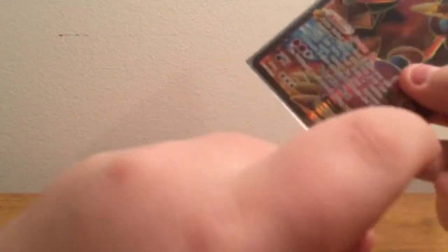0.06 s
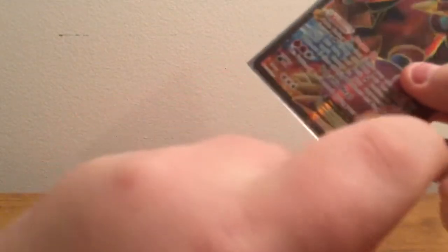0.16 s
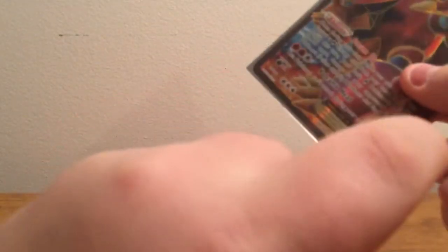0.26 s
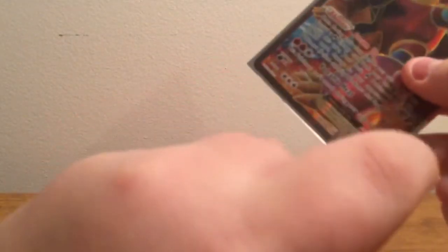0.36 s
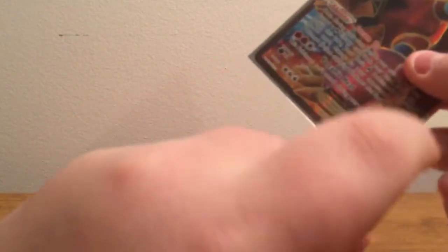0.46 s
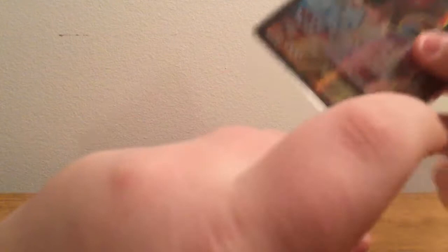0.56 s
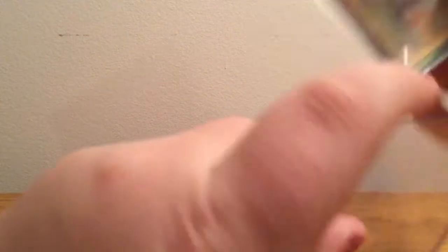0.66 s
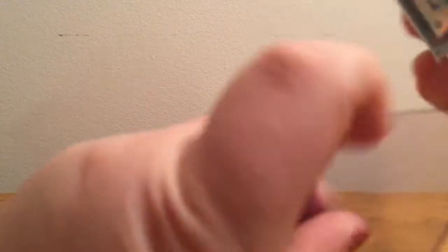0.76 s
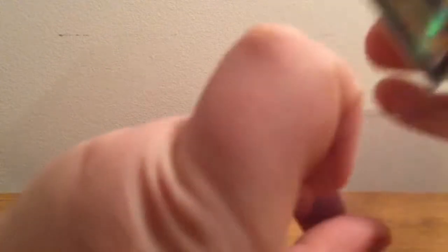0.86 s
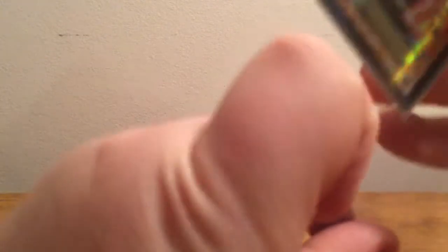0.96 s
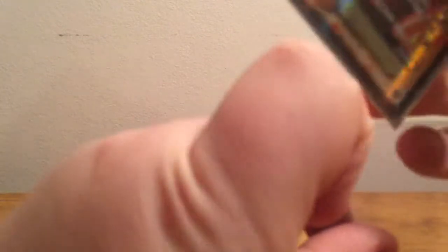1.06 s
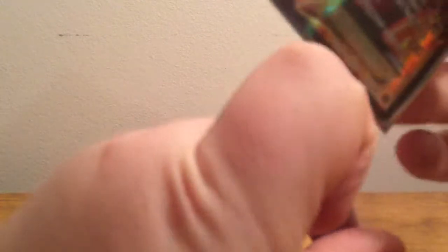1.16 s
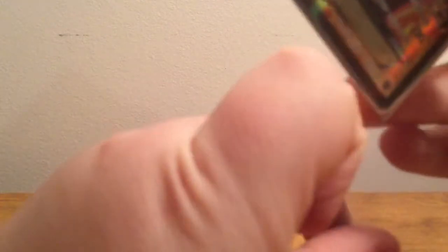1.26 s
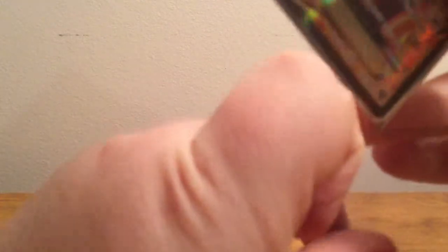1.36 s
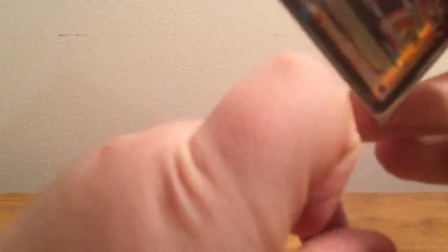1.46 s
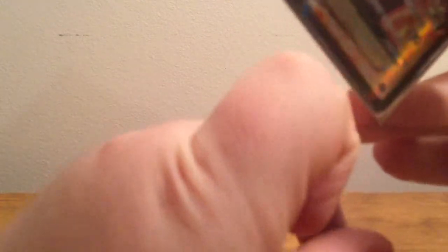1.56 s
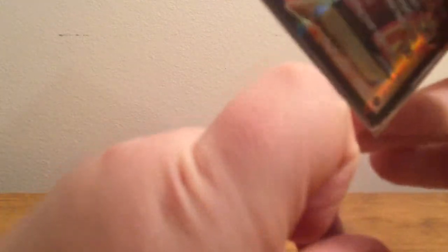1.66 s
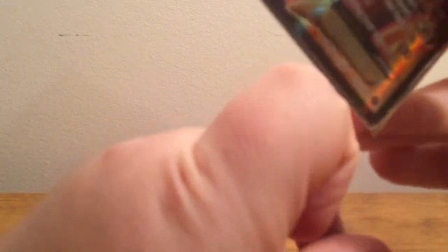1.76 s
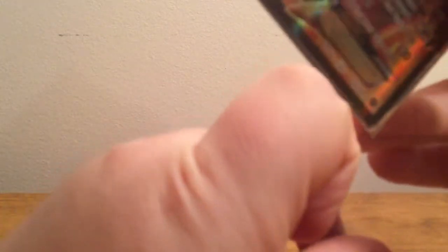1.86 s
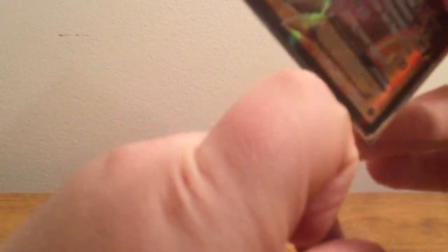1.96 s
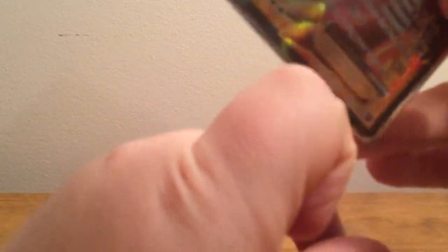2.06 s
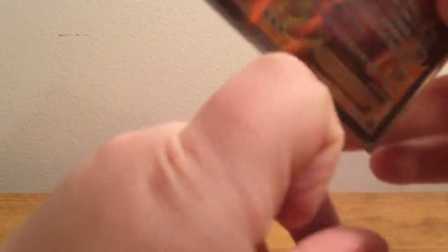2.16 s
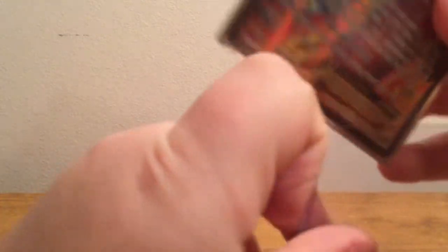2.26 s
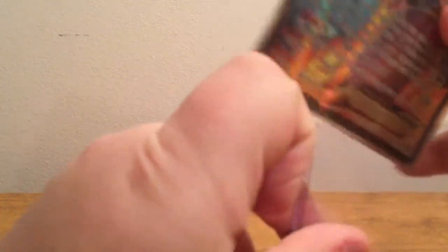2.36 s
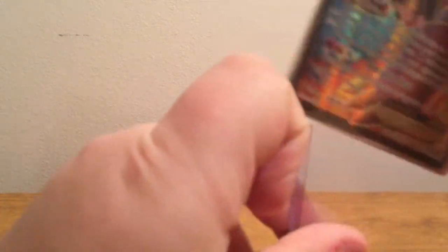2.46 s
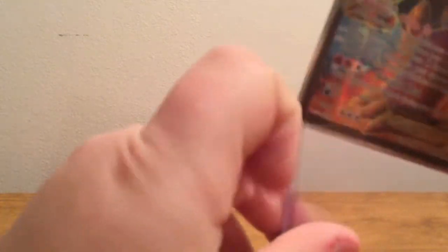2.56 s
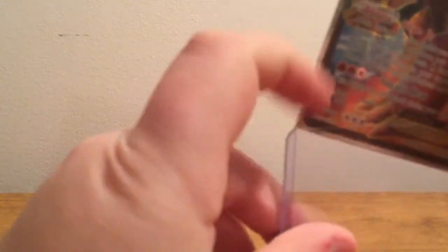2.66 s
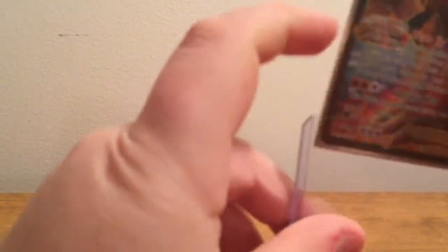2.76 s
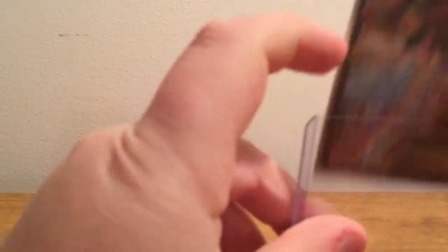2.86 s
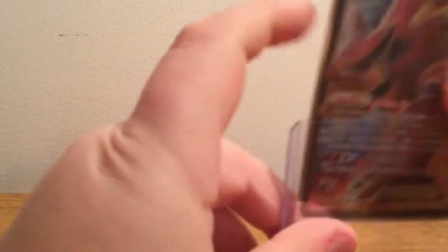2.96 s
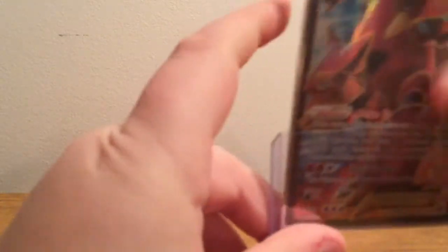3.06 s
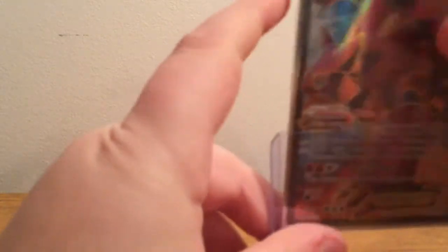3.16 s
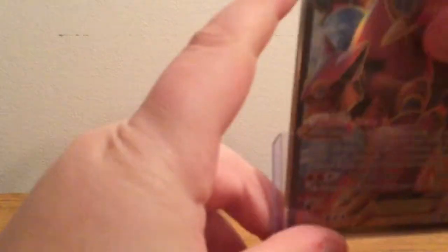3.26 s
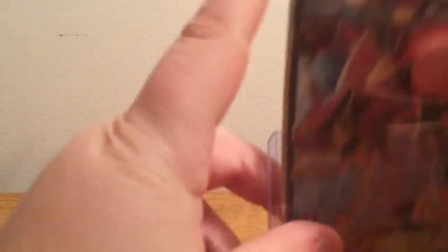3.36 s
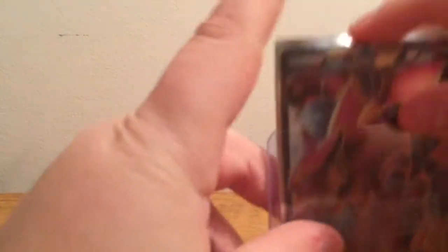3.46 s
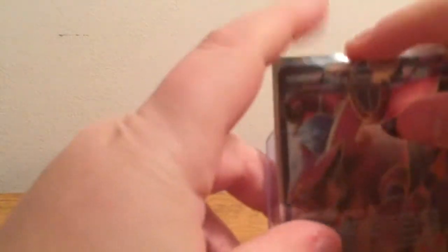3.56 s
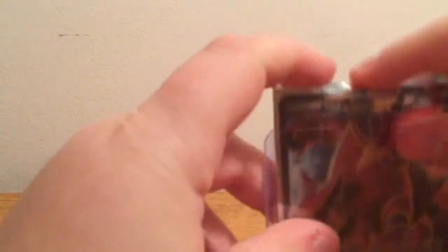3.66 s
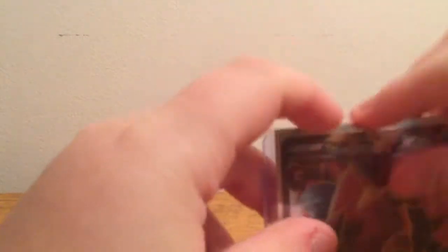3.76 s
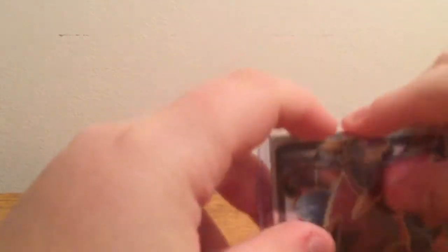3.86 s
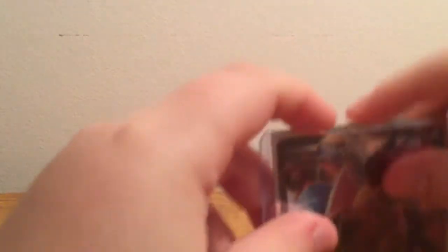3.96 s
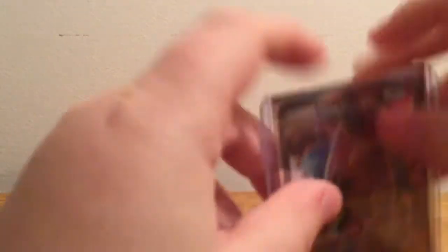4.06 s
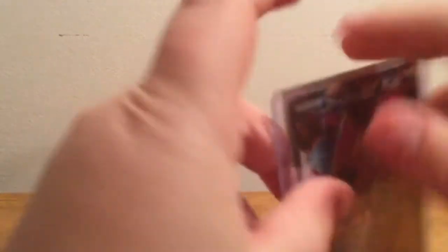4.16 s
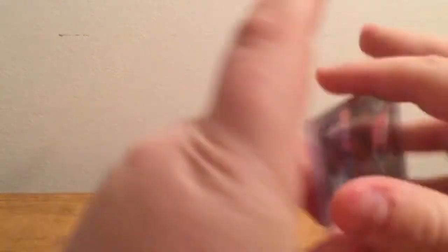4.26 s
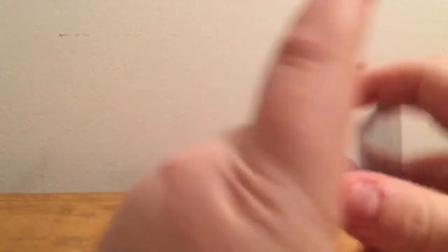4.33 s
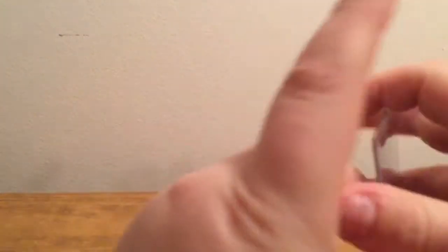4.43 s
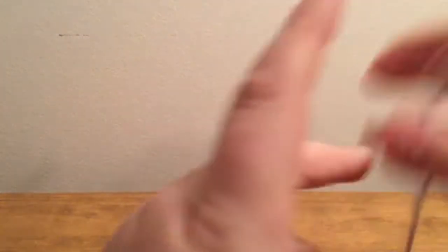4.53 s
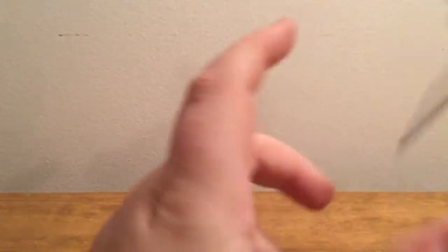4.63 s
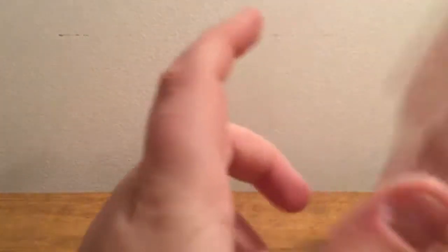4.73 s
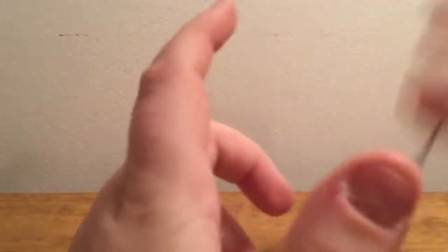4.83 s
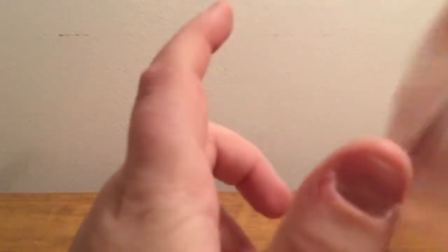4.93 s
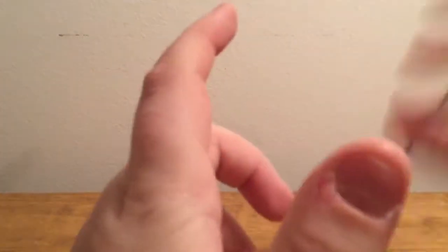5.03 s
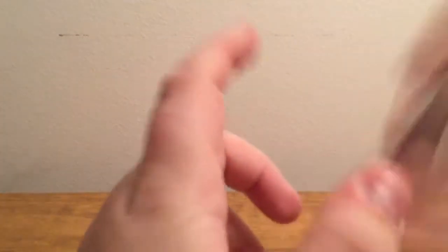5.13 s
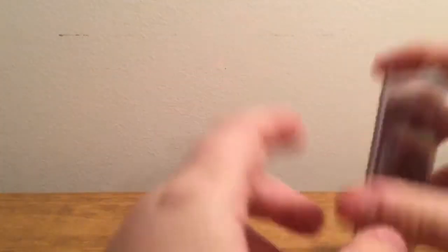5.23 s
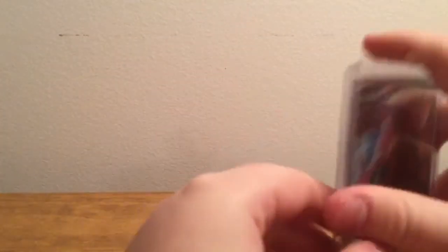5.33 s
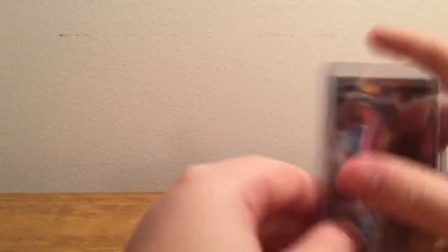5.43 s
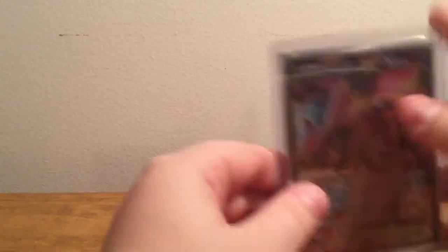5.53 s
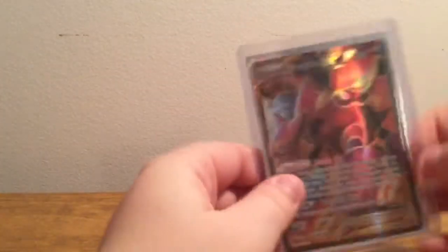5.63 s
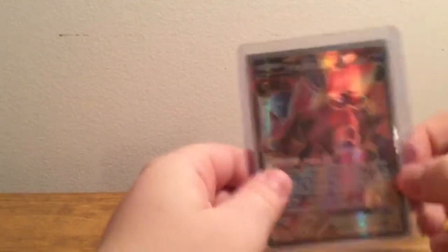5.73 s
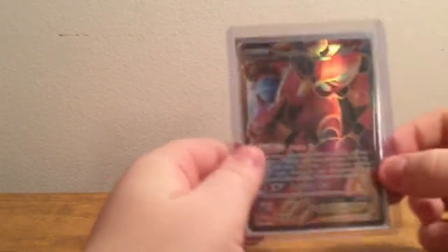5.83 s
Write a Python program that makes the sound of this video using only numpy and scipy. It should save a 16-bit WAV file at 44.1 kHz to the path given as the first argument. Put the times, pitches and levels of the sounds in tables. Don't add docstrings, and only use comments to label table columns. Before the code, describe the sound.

In a small quiet room, close to the microphone, a sleeved card is handled with faint film ticks and soft bumps. From about two seconds the plastic hisses, scrapes and squeaks briefly into a rigid holder. After a couple of light knocks, three very loud, quick plastic taps strike the wooden table, then faint rustling remains over a low hum.

```python
import sys
import numpy as np
from scipy import signal
from scipy.fft import rfft, irfft, next_fast_len
from scipy.io import wavfile
from scipy.ndimage import uniform_filter1d, minimum_filter1d, map_coordinates

SR = 44100
rng = np.random.default_rng(int(sys.argv[2]) if len(sys.argv) > 2 else 0)


def natural_amplitude(level_db):
    exponent = np.asarray(level_db, float) / 20
    return 10 ** exponent


def inscribe(sig):
    pcm = np.round(np.clip(np.atleast_2d(sig).T, -1, 1) * 32767)
    wavfile.write(sys.argv[1], SR, pcm.astype(np.int16))


N = 259837

# corner landing in seconds, peak level in dB, gap until the whole edge lands in seconds.
TAPS = [
    (4.807, -2, 0.008),
    (5.018, -2.5, 0.0061),
    (5.218, -3, 0.0039),
]
# holder, thud and clatter in dB, hardness in dB per octave,
# film snap and its bright glint in dB. Holder, snap and glint are over the tap's peak, the others over the holder.
CORNER_LANDING = (-0.5, -26, -3, -6.5, -29, -28)
EDGE_LANDING = (-5.5, -19, -10, 3, -7.5, -12)


def landings():
    found = []
    for s, db, gap in TAPS:
        found.append((s, db, CORNER_LANDING))
        found.append((s + gap, db, EDGE_LANDING))
    return found


# pitch in Hz, level in dB, 60 dB decay in seconds.
HOLDER_MODES = [(700, -3, .045), (770, -6, .04), (915, -3, .04), (1030, -1, .04), (1155, 0, .045),
                (1346, -3, .04), (1600, -3, .04), (1895, -6, .035), (2150, -7, .03), (2390, -6, .035),
                (2680, -3, .045), (2820, -7, .03), (3240, -12, .03), (3800, -13, .035)]
# pitch in Hz, level in dB, 60 dB decay in seconds.
TABLE_MODES = [(136, -21, 0.16), (173, -16, 0.14), (231.3, 0, 0.082), (338.7, -8, 0.083),
               (379, -15.5, 0.068)]
# frequency in Hz, level in dB per Hz.
CLATTER_COLOUR = [(260, -48.5), (450, -10.5), (689, -14.5), (853, -5.5), (1230, -11.5), (1480, -12),
                  (1620, -2.5), (2630, -1.5), (2990, -1), (9000, -22.5), (11700, -72), (19800, -120)]
# start in seconds, holder peak in dB, table thud and clatter
# in dB over the holder, hardness in dB per octave.
TOUCHES = [(0.0, -45.5, -10.5, -14, -6), (0.361, -39, -21.5, -6.5, -4.5), (2.011, -42, -18.5, 1, -47),
           (2.134, -63, -9, -10, -22), (2.325, -41.5, -15, -8, -39), (2.348, -48, -13, -20, -30),
           (2.581, -62, -10, -10, -2), (2.744, -40, -4.5, 9.5, -24.5), (3.224, -46.5, -14.5, -24, -39),
           (3.259, -55, -22, -23, -24), (3.775, -46, -18, -15, 0), (4.41, -22.5, -16, -27, -14),
           (4.439, -23, -24, -7.5, -12.5), (4.479, -41.5, -32, -4, -31), (5.498, -59.5, -3, -24, 3.5),
           (5.758, -62.5, -6, -28, -17)]
# start in seconds, peak level in dB.
HAND_BUMPS = [(0.266, -56), (0.356, -39), (1.516, -49.5), (4.102, -57), (5.399, -58), (5.682, -48),
              (5.703, -50), (5.759, -44), (5.822, -41.5), (5.841, -51)]


def knocks():
    out = np.zeros(N)
    t = np.arange(8192) / SR
    hz = np.fft.rfftfreq(len(t), 1 / SR) + 1
    contacts = list(TOUCHES)
    for s, db, (holder_db, thud_db, clatter_db, hard_db, _, _) in landings():
        contacts.append((s, db + holder_db, thud_db, clatter_db, hard_db))
    for s, db, thud_db, clatter_db, hard_db in contacts:
        dulling_db = 1.2 * np.minimum(hard_db, 0) * np.log2(np.maximum(hz / 1100, 1))
        colour = natural_amplitude(along(CLATTER_COLOUR, hz) + dulling_db)
        clatter = unit(irfft(rfft(rng.standard_normal(len(t))) * colour))
        clatter = clatter * natural_amplitude(-60 * t / .05) * (1 - np.exp(-t / .001))
        holder = ring(HOLDER_MODES, scatter_db=1.5, rise=.0008, tilt_db=hard_db, spot_hz=1100)
        table = natural_amplitude(thud_db + 10) * ring(TABLE_MODES, scatter_db=-2.5, rise=.0028)
        add(out, s + .00091, natural_amplitude(db + 2.5) * (holder + table), wet_db=-14.5)
        add(out, s + .0006, natural_amplitude(db + clatter_db) * clatter, wet_db=-14)
    for s, db in HAND_BUMPS:
        add(out, s, natural_amplitude(db) * ring(TABLE_MODES, scatter_db=3, rise=.005), wet_db=-12)
    return out


# start in seconds, peak level in dB, centre
# in Hz.
FILM_SNAPS = [(0.362, -35.5, 1420), (0.4224, -65, 3980), (0.6484, -64.5, 5600), (0.737, -59.5, 14600),
              (1.2436, -54, 15600), (1.3503, -52, 13100), (1.516, -60.5, 3790), (2.2518, -54.5, 6790),
              (2.3189, -32, 12500), (2.3185, -31, 6100), (2.4468, -53.5, 10900), (2.469, -50, 13000),
              (2.7436, -44, 3800), (2.741, -42, 11600), (2.784, -56.5, 5080), (2.9208, -35.5, 4260),
              (2.9216, -29.5, 12600), (2.958, -37, 4060), (3.2044, -68, 3970), (3.2354, -46, 9800),
              (3.3, -54, 5600), (3.5289, -43.5, 6850), (3.7775, -39.5, 5300), (4.1104, -49, 13600),
              (4.3674, -59.5, 3500), (4.3863, -52.5, 7100), (4.4128, -49, 3990), (4.438, -48.5, 4030),
              (4.6234, -56, 9300), (5.499, -50, 5490)]


def snaps():
    snap_octaves, glint_octaves = .57, .5
    tap_lag_s, bounce_s, bounce_share = .0005, .0007, .3
    out = np.zeros(N)
    t = np.arange(1024) / SR
    hz = np.fft.rfftfreq(len(t), 1 / SR) + 1
    bounce = 1 + bounce_share * np.exp(-2j * np.pi * hz * bounce_s)
    bursts = [(*row, snap_octaves) for row in FILM_SNAPS]
    for s, db, (*_, snap_db, glint_db) in landings():
        bursts.append((s + tap_lag_s, db + snap_db, 3800, snap_octaves))
        bursts.append((s + tap_lag_s, db + glint_db, 11500, glint_octaves))
    for s, db, centre_hz, octaves in bursts:
        envelope = natural_amplitude(-60 * np.abs(t - .003) / np.where(t < .003, .006, .012))
        burst = rng.standard_normal(len(t)) * envelope
        band = np.exp(-.5 * (np.log2(hz / centre_hz) / octaves) ** 2)
        burst = irfft(rfft(burst) * bounce * band)
        add(out, max(s - .002, 0), natural_amplitude(db + 1) * burst / np.max(np.abs(burst)), wet_db=-19)
    return out


# frequency in Hz, level in dB per Hz.
HISS_COLOUR = [(2650, -5), (4500, -0.5), (5270, 1.5), (6440, 2.5), (15100, -0.5), (16200, -2), (16500, -38)]
# frequency in Hz, level in dB per Hz.
SCRAPE_COLOUR = [(1500, -3.5), (2100, 7.5), (3000, 3.5), (3800, 2), (5000, -5.5), (6500, -20.5),
                 (8500, -28)]
# frequency in Hz, level in dB per Hz.
RASP_COLOUR = [(170, -38), (240, 9), (400, -1.5), (600, 3.5), (950, 1.5), (1150, 2.5), (1600, -5.5),
               (2000, -3), (2600, -18), (3300, -47)]
# time in seconds, resonance in Hz.
POCKET_PITCH = [(0, 925), (2, 766), (2.149, 1000), (2.4, 815), (2.7, 690), (3.1, 660), (3.25, 800),
                (3.43, 1200), (3.74, 1270), (3.8, 1640), (3.87, 1230), (4.03, 1390), (4.12, 791),
                (5.45, 1100)]
# start in seconds, length in seconds, level in dB, swell over the stroke in dB.
FILM_SLIDES = [(0, .13, -73.5, -4), (1.24, .03, -81, -2), (1.5, 0.014, -69.5, 8.5), (2.115, 0.052, -64, 5),
               (2.2, .11, -75.5, 11), (2.325, 0.038, -63.5, -8), (2.39, 0.19, -71.5, 4),
               (2.62, 0.048, -64, 10), (2.775, 0.017, -68, -7), (2.925, 0.12, -56.5, -5),
               (3.08, 0.018, -70.5, 1), (3.232, 0.025, -69, 9), (3.295, 0.12, -66, 18.5),
               (3.43, 0.067, -62, -11), (3.49, 0.13, -64, -9), (3.65, 0.059, -57.5, 4.5),
               (3.745, 0.077, -60.5, 6.5), (3.9, 0.028, -63.5, 3), (4, 0.022, -60.5, 10),
               (4.085, 0.032, -68.5, -2.5), (4.22, 0.073, -75, 2), (4.36, 0.031, -71, 22),
               (5.42, 0.056, -61.5, 7), (5.495, 0.014, -72, -12), (5.52, .17, -76, -3),
               (5.7, 0.23, -79, -4)]
# start in seconds, length in seconds, rasp level in dB,
# swell over the stroke in dB, edge scrape in dB over the rasp.
CARD_PUSHES = [(0, 0.046, -51, -13, -23), (0.064, 0.064, -63, -4, -10.5), (1.511, 0.015, -72.5, -4, -4),
               (5.544, 0.17, -87.5, 0, 10), (2.136, .07, -57, 5, -22.5), (2.197, .08, -69, -1, -10.5),
               (2.308, .02, -80.5, 4, 10), (2.329, .03, -65, -6, -22.5), (2.57, .015, -72.5, 2, -6),
               (2.631, .06, -66, 7, -16), (2.778, .02, -70, 0, -6), (2.923, .03, -54.5, -5, -12),
               (2.965, 0.088, -51.5, -8.5, -12), (3.083, .02, -62.5, -5, -12), (3.228, .03, -59, -6, -22),
               (3.301, .14, -63, 7, -21), (3.478, .14, -58.5, 6, -15.5), (3.666, .06, -48.5, -7, -12),
               (3.774, .03, -47, -10, -18.5), (3.857, 0.1, -45, 4.5, -18.5),
               (3.907, 0.038, -41.5, -2.5, -6), (4.009, 0.017, -43, 6.5, -1.5),
               (5.415, 0.047, -76.5, -1, 9.5), (5.497, .012, -73, -2, -1)]


def rubbing():
    hiss = coloured(gritty(grit_db=2.5, patchy_db=3.5, crackle=1.5), HISS_COLOUR)
    scrape = coloured(gritty(grit_db=2.5, patchy_db=4, crackle=4), SCRAPE_COLOUR)
    rasp = coloured(gritty(grit_db=1, patchy_db=3, crackle=2), RASP_COLOUR)
    pocket_hz = np.interp(np.arange(N) / SR, *np.transpose(POCKET_PITCH))
    rasp = unit(emphasis(rasp, pocket_hz, lift_db=11, octaves=.25))
    start, length, db, swell_db, edge_db = np.transpose(CARD_PUSHES)
    rasping = gain_curve(start, length, db, swell_db) * rasp
    scraping = gain_curve(start, length, db + edge_db, swell_db) * scrape
    hissing = gain_curve(*np.transpose(FILM_SLIDES)) * hiss
    return hissing + rasping + scraping


# start in seconds, length in seconds, level in dB,
# first pitch in Hz, last pitch in Hz.
SLEEVE_SQUEALS = [
    (3.29, .05, -58, 900, 1100),
    (3.45, .055, -54, 1180, 1500),
    (3.55, .1, -57, 1150, 1420),
    (3.72, .045, -52, 1300, 2200),
    (3.785, .04, -56, 1500, 2530),
]


def squeal():
    start, length, db, first_hz, last_hz = np.transpose(SLEEVE_SQUEALS)
    knots_s = np.ravel([start, start + length], "F")
    knots_hz = np.ravel([first_hz, last_hz], "F")
    glide = np.interp(np.arange(N) / SR, knots_s, knots_hz)
    pitch = glide * (1 + .06 * wobble(250))
    phase = 2 * np.pi * np.cumsum(pitch) / SR
    tone = natural_amplitude(5.4 * wobble(90)) * np.sin(phase)
    return gain_curve(start, length, db - 6) * tone


# frequency in Hz, level in dB per Hz.
HUM_COLOUR = [(59, -44.5), (100, -17.5), (150, -2), (174, -7.5), (205, -10.5), (237, -1.5), (266, -13.5),
              (444, -17.5), (481, -22), (585, -32), (700, -30), (910, -62), (1540, -120)]
# time in seconds, level in dB.
HUM_LEVEL = [(0.0, -64), (0.43, -63), (0.92, -67), (1.31, -63), (1.62, -66), (2.15, -60), (3.46, -62),
             (3.82, -58), (4.18, -63), (4.74, -63), (5.0, -54), (5.17, -54), (5.3, -59), (5.58, -64),
             (5.89, -61)]
# frequency in Hz, level in dB per Hz.
RUMBLE_COLOUR = [(12, -52), (20, -18.5), (43, 1), (60, 8), (86, -8.5), (110, 1.5), (140, -33.5),
                 (240, -120)]
# frequency in Hz, level in dB per Hz.
AIR_COLOUR = [(290, -30), (500, -4.5), (793, -2.5), (890, -12), (1060, -7), (2630, -17), (5250, -19.5),
              (7310, -25), (8950, -21.5), (15700, -33.5)]


def background():
    hum = coloured(rng.standard_normal(N) * natural_amplitude(2.5 * wobble(14)), HUM_COLOUR)
    hum_db = 3 + np.interp(np.arange(N) / SR, *np.transpose(HUM_LEVEL))
    rumble = natural_amplitude(-69.5) * coloured(rng.standard_normal(N), RUMBLE_COLOUR)
    air = natural_amplitude(-75.5) * coloured(rng.standard_normal(N), AIR_COLOUR)
    return natural_amplitude(hum_db) * hum + rumble + air


def ring(modes, scatter_db, rise, tilt_db=0., spot_hz=100.):
    t = np.arange(SR // 4) / SR
    hz, db, t60 = np.transpose(modes)[:, :, None]
    chance = rng.standard_normal((3, *db.shape))
    away = np.log2(hz / spot_hz)
    level = db + scatter_db * chance[0] + np.where(away > 0, tilt_db, 4) * away
    phase = 2 * np.pi * hz * (1 + .01 * chance[1]) * t + .7 * chance[2]
    x = np.sum(natural_amplitude(level - 60 * t / t60) * np.sin(phase), axis=0)
    below = signal.butter(3, .85 * np.min(hz), "highpass", fs=SR, output="sos")
    x = signal.sosfilt(below, x * (1 - np.exp(-t / rise)))
    return x / np.max(np.abs(x))


def gritty(grit_db, patchy_db, crackle):
    slips = rng.standard_normal(N) * natural_amplitude(grit_db * wobble(760))
    crackles = rng.exponential(size=N) * (rng.random(N) < 150 / SR)
    z = signal.stft(slips + crackle * crackles, nperseg=256)[2]
    streaks = uniform_filter1d(rng.standard_normal(z.shape), size=3, axis=0)
    streaks = uniform_filter1d(streaks, size=18, axis=1)
    return signal.istft(z * natural_amplitude(patchy_db * unit(streaks)), nperseg=256)[1][:N]


def gain_curve(start, length, db, swell_db=0.):
    rise_db_per_s, fall_db_per_s = 906, 715
    t = np.arange(0, N, 44)[:, None] / SR
    level = db + swell_db * (np.clip((t - start) / length, 0, 1) - .5)
    level = level - rise_db_per_s * np.maximum(start - t, 0)
    level = level - fall_db_per_s * np.maximum(t - start - length, 0)
    return np.interp(np.arange(N) / SR, t[:, 0], natural_amplitude(level.max(axis=1)))


def emphasis(x, centre_hz, lift_db, octaves):
    hz, t, z = signal.stft(x, SR, nperseg=512)
    centre = np.interp(t, np.arange(N) / SR, centre_hz)
    away = np.log2((hz[:, None] + 1) / centre) / octaves
    lift = natural_amplitude(lift_db * np.exp(-.5 * away ** 2))
    return signal.istft(z * lift, SR, nperseg=512)[1][:N]


def wobble(rate):
    knots = rng.standard_normal(int(N * rate / SR) + 4)
    return map_coordinates(knots, [np.arange(N) * rate / SR])


def unit(x):
    return x / np.sqrt(np.mean(x ** 2) + 1e-20)


def along(points, hz):
    f, v = np.transpose(points)
    return np.interp(np.log(hz + 1), np.log(f + 1), v)


def filtered(x, response):
    m = next_fast_len(N + SR // 2)
    return irfft(rfft(x, m) * response(np.fft.rfftfreq(m, 1 / SR)), m)[:N]


def coloured(x, spectrum):
    return unit(filtered(x, lambda hz: natural_amplitude(along(spectrum, hz))))


# frequency in Hz, 60 dB decay in seconds.
ROOM_DECAY = [(150, 0.26), (700, 0.19), (2000, 0.17), (5000, 0.24), (13000, 0.16)]


def room(x, delay=.0082):
    hz, t, z = signal.stft(rng.standard_normal(SR // 3), SR, nperseg=256)
    decay = natural_amplitude(-60 * t / along(ROOM_DECAY, hz)[:, None])
    tail = signal.istft(z * decay, SR, nperseg=256)[1]
    delayed = np.pad(x, (round(delay * SR), 0))
    return signal.fftconvolve(delayed, tail / np.linalg.norm(tail))


def add(track, s, sound, wet_db):
    for part in sound, natural_amplitude(wet_db) * room(sound):
        spot = track[round(s * SR):][:len(part)]
        spot += part[:len(spot)]


def scene():
    return (knocks() + snaps() + rubbing() + squeal() + background())[None]


def smear(x, noise_db, size, top_hz=8000):
    hz, _, z = signal.stft(x, SR, nperseg=size)
    in_band = ((hz > 300) & (hz < top_hz))[:, None]
    strength = uniform_filter1d(np.abs(z), size=4, axis=-2) * in_band
    noise = strength * np.exp(2j * np.pi * rng.random(z.shape))
    return natural_amplitude(noise_db) * signal.istft(noise, SR, nperseg=size)[1][..., :N]


def low_pass(x):
    return signal.sosfilt(signal.butter(12, 16620, fs=SR, output="sos"), x)


def record(dry):
    low_cut = signal.butter(3, 45, "highpass", fs=SR, output="sos")
    heard = signal.sosfilt(low_cut, dry)
    need = np.minimum(1, .7 / (np.abs(heard) + 1e-9))
    held = heard * uniform_filter1d(minimum_filter1d(need, size=120), size=60)
    held = filtered(held[0], lambda hz: np.clip((16500 - hz) / 700, 0, 1))[None]
    long_smear = smear(held, noise_db=-24, size=2048)
    short_smear = smear(held, noise_db=-12.5, size=896)
    return low_pass(held + long_smear + short_smear)


dry = scene()
out = record(dry)
inscribe(out)
```